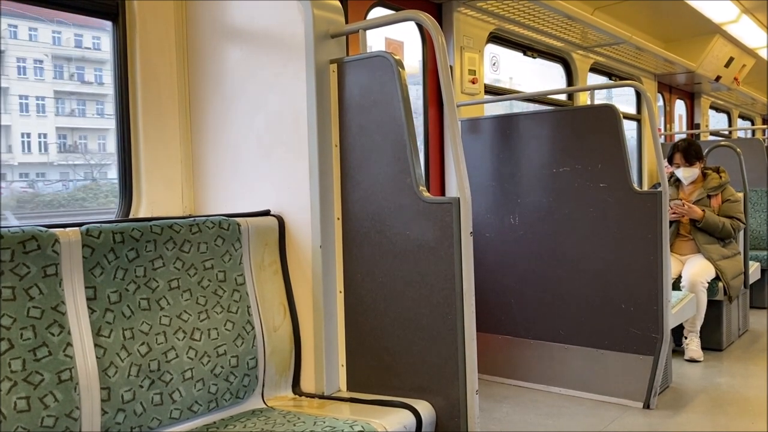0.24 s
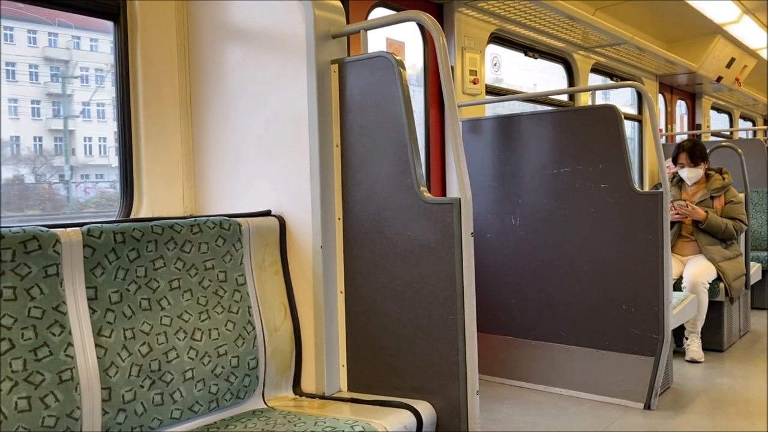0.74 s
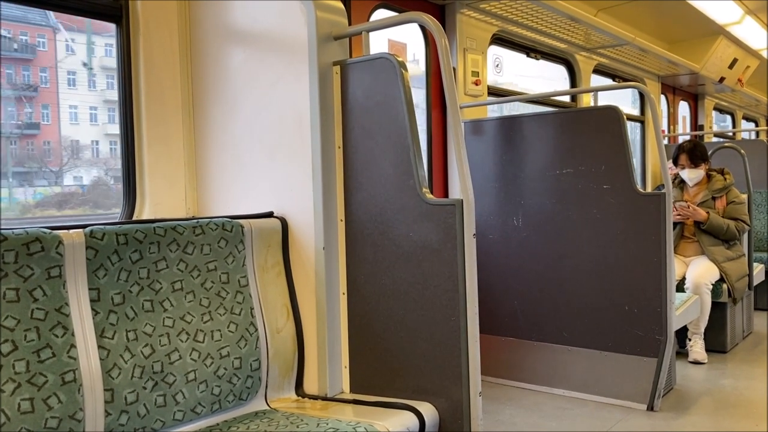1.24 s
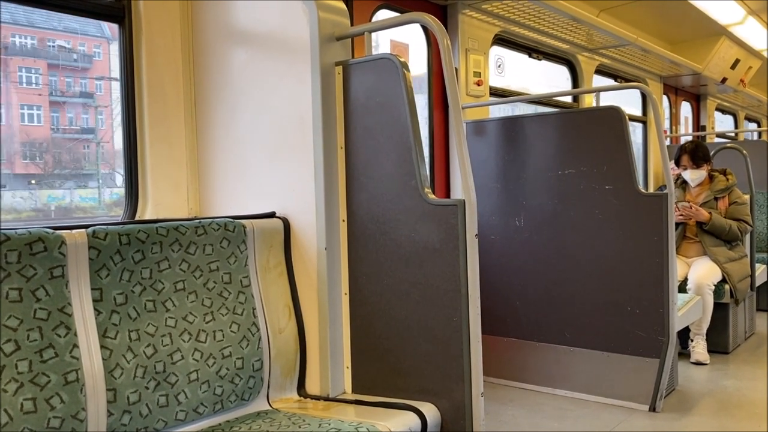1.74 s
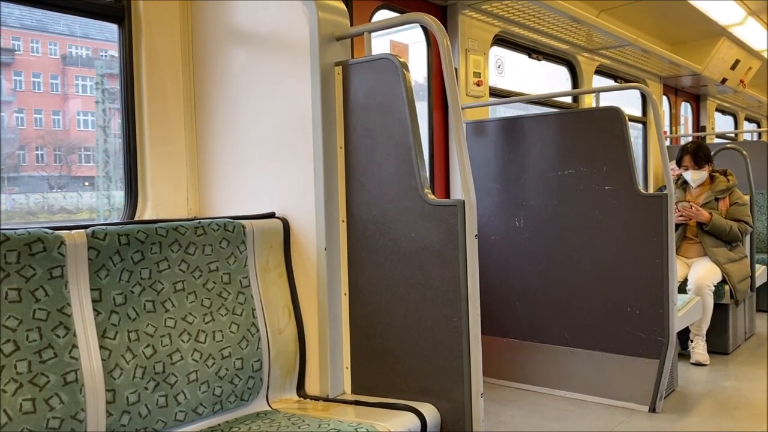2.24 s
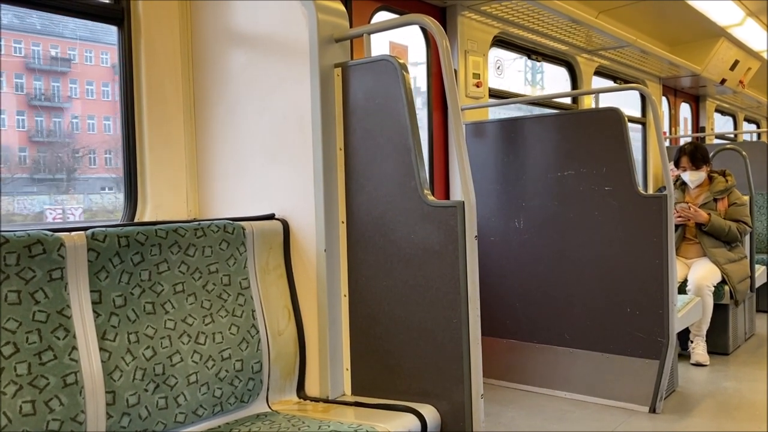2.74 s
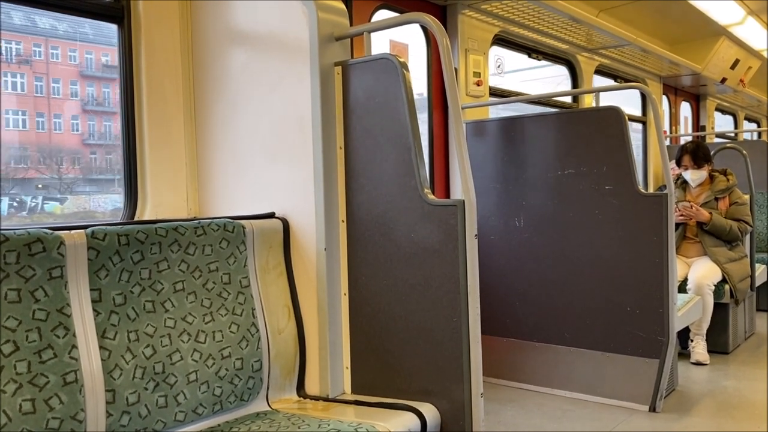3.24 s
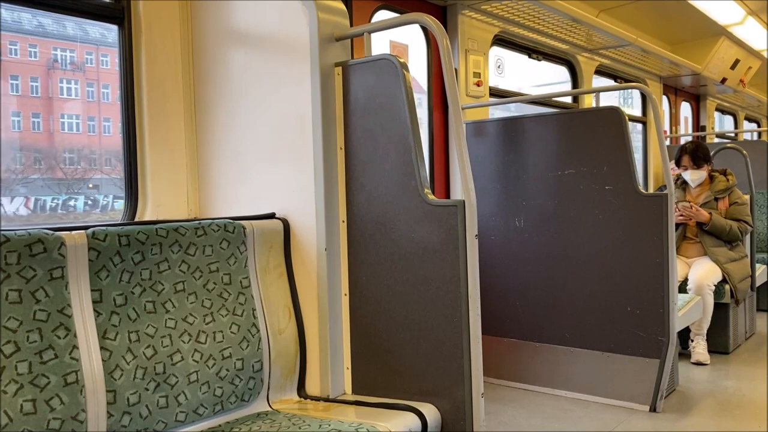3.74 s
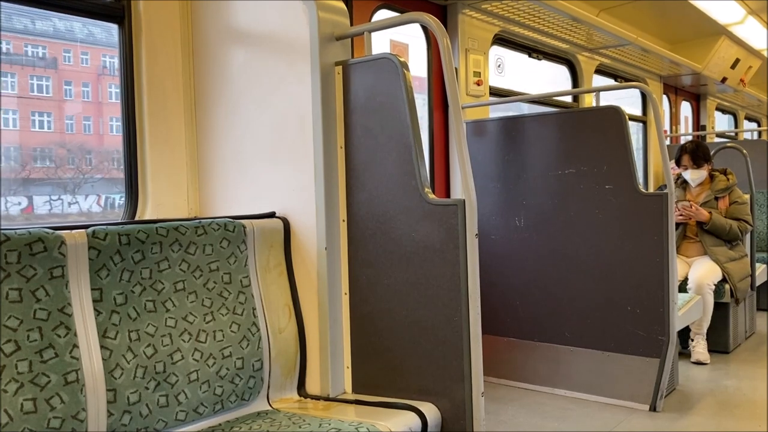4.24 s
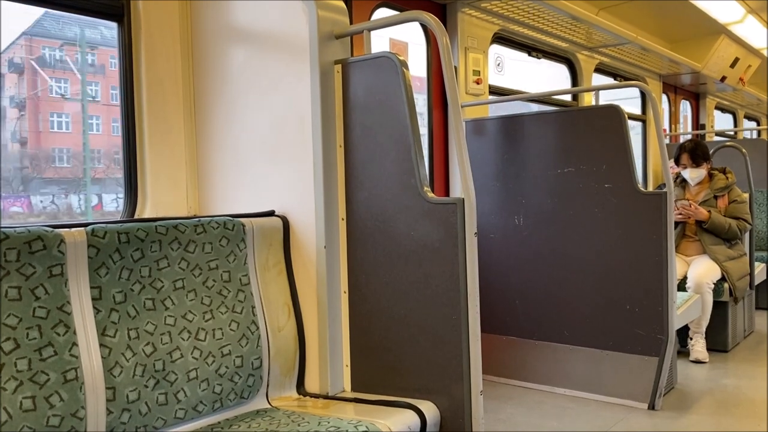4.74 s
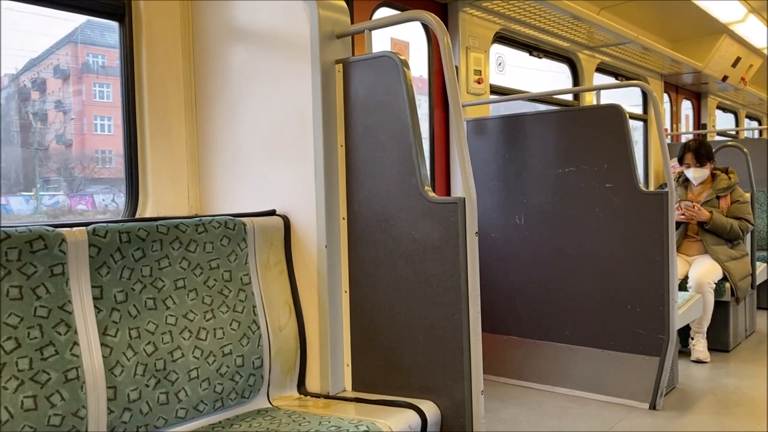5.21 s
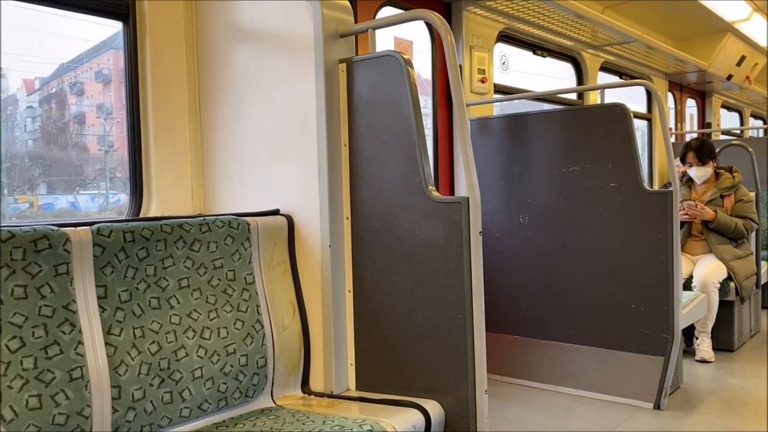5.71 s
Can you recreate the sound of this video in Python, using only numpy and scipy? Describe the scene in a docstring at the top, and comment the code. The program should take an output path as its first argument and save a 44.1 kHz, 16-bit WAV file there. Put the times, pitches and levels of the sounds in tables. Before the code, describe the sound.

A wide stereo pickup within a train carriage: low rumble swelling with track roughness, body drumming and frequent thuds. Early door bangs, chatter and thin panel buzz give way to a smoother stretch. At about four seconds metallic coupling clunks ring, followed by the strongest jolts, sharp steel knocks, grinding and door rattle, with one more door bang late. Quiet ventilation hiss throughout.

```python
"""A deep rumble with frequent jolts fills an electric commuter train at speed, over rolling noise and air hiss.
Under it lie a faint motor hum and a faint narrow high hiss. On two rough stretches the door bangs and rattles;
a panel buzzes on the first, the wheels knock and grind on the second. Coupling clunks and trim ticks come between.
Noise layers are shaped by spectra and follow the track's roughness; blows are decaying noise and ringing modes.
"""
import sys
import numpy as np
from scipy import signal
from scipy.fft import rfft, irfft, next_fast_len
from scipy.io import wavfile
from scipy.ndimage import uniform_filter1d, map_coordinates

SR = 44100
rng = np.random.default_rng(int(sys.argv[2]) if len(sys.argv) > 2 else 0)


def waveform_to_disk(signal):
    """Save audio, clipped to [-1, 1], as 16-bit WAV at the path in sys.argv[1]."""
    frames = np.transpose(np.atleast_2d(signal))
    scaled = np.clip(frames, -1, 1) * 32767
    samples = np.round(scaled).astype(np.int16)
    wavfile.write(sys.argv[1], SR, samples)


N = 263277

# track under the car, rough, smooth, then rougher: (time [s], long waves in the rail [dB], short ripples [dB])
TRACK = [(0, -2.5, 0.5), (.2, -5, -2), (.35, -1, 1.5), (.86, -3.5, 0), (1.02, 1.5, 3.5), (1.16, -4, -0.5),
         (1.32, 1.5, 7.5), (1.58, 0, 2.5), (2.15, 1, -3), (2.3, -6.5, -2.5), (3.3, -8, -6.5),
         (3.82, -6.5, -4.5), (3.95, -2, -2.5), (4.68, -1.5, 0), (4.82, 3, 8.5), (5.4, 0.5, 3.5),
         (5.5, -1.5, -0.5), (5.97, 1, 2.5)]
# motor speed, rising until 1.5 s, then slowly falling: (time [s], relative speed [ratio])
SPEED = [(0, 0.96), (1.5, 1.04), (2.7, 1), (3.6, .978), (5.97, 0.93)]
# car resonances: (centre [Hz], width [Hz], lift [dB])
CAR_MODES = [(110.8, 8.4, 6.5), (298, 14, 8), (346.4, 38, 7.5), (447, 6.4, 10)]


def amp(db):
    """Decibels to gain."""
    return 10 ** (np.asarray(db) / 20)


def along(points, hz):
    """(Hz, value) points read on a log axis."""
    f, v = np.transpose(points)
    return np.interp(np.log(hz + 1), np.log(f + 1), v)


def curves(rows):
    """One value per sample for each column after the time."""
    time_s, *columns = np.transpose(rows)
    return [np.interp(np.arange(N) / SR, time_s, column) for column in columns]


def wobble(knots_per_s):
    """A smooth curve through random knots."""
    knots = rng.standard_normal(int(N * knots_per_s / SR) + 4)
    return map_coordinates(knots, [np.arange(N) * knots_per_s / SR])


def filtered(x, response):
    """Multiply the spectrum of x by a response of frequency."""
    m = next_fast_len(N + SR // 2)
    return irfft(rfft(x, m) * response(np.fft.rfftfreq(m, 1 / SR)), m)[..., :N]


def heard(pair, spectrum, modes=(), wide_db=0, lean_db=0, tilt_db=0):
    """Colour two unrelated signals and spread them: bass near mono, treble all around; mid at rms 1."""
    # stereo width: (frequency [Hz], side minus mid before wide_db [dB])
    side_curve = [(60, -25.5), (110, -9.5), (200, -10.5), (380, -4.5), (700, 1), (1290, 2.5), (2380, -2),
                  (4400, -4), (8120, 1), (15000, 2)]
    # stereo balance: (frequency [Hz], left minus right before lean_db [dB])
    lean_curve = [(60, -2), (110, -0.5), (200, 1.5), (380, 0.5), (700, -0.5), (1290, -2.5), (2380, 1),
                  (4400, 2.5), (8120, -1.5), (15000, -0.5)]

    def colour_db(hz):
        lifts = sum(db / (1 + (2 * (hz - centre) / width) ** 2) for centre, width, db in modes)
        return along(spectrum, hz) + lifts + tilt_db * np.log2(hz + 1)

    def mid_side_gain(hz):
        return amp(colour_db(hz) + np.outer([0, 1], along(side_curve, hz) + wide_db))

    mid, side = filtered(pair, mid_side_gain)
    ears = np.array([mid + side, mid - side]) / np.std(mid)
    return filtered(ears, lambda hz: amp(np.outer([.5, -.5], along(lean_curve, hz) + lean_db)))


def noise():
    """Two unrelated white noises."""
    return rng.standard_normal((2, N))


def steadied(x, seconds):
    """Even out swells slower than the given time."""
    power = uniform_filter1d(x.mean(0) ** 2, max(int(seconds * SR), 8))
    return x / np.sqrt(np.abs(power) + 1e-9)


def blow(start_s, t60_s, attack_s):
    """Envelope of a blow: exponential attack and decay."""
    t = np.arange(SR) / SR
    shape = (1 - np.exp(-t / attack_s)) * amp(-60 * t / t60_s)
    return np.pad(shape, (max(round(start_s * SR), 0), N))[:N]


def spells(table, rise_s, t60_s):
    """Envelope of (start, length, dB) rows: each swells, holds and dies away."""
    t = np.arange(N) / SR
    out = np.zeros(N)
    for start_s, length_s, db in table:
        swell = 1 - np.exp(-np.maximum(t - start_s, 0) / rise_s)
        out += swell * amp(db - 60 * np.maximum(t - start_s - length_s, 0) / t60_s)
    return out


def cabin(x, t60_s):
    """Dense reflections between walls and seats, a different set for each of two paths."""
    t = np.arange(SR // 2) / SR
    tail = rng.standard_normal((2, len(t))) * amp(-60 * t / t60_s)
    return signal.fftconvolve(x[None], tail / np.linalg.norm(tail[0]), axes=1)[:, :N]


def clatter(rough_db):
    """Fast uneven level of parts that bounce against each other, at rms 1."""
    gain = amp(rough_db * wobble(knots_per_s=160))
    return gain / np.sqrt(np.mean(gain ** 2))


def strikes(table, spectrum, modes, attack_s, rough_db, wide_db, lean_db):
    """Blows on one object: a quick contact crack, and a slower body that clatters as it dies."""
    # first contact of hard parts: (frequency [Hz], level [dB])
    crack_spectrum = [(200, -29.5), (800, -3), (1500, 0), (2150, 3.5), (2900, -7), (4500, -17.5),
                      (8000, -27.5), (15000, -45.5)]
    contact = steadied(heard(noise(), crack_spectrum, wide_db=-2.0, lean_db=1.5), seconds=0.0051)
    out = np.zeros((2, N))
    for start_s, db, bright_db, t60_s, crack_db in table:
        body = heard(noise(), spectrum, modes, wide_db, lean_db, tilt_db=bright_db)
        body = blow(start_s, t60_s, attack_s) * clatter(rough_db) * body
        crack = amp(crack_db) * blow(start_s, t60_s=0.028, attack_s=0.00039) * contact
        out += amp(db) * (body + crack)
    return out


def clang(table, modes, ring_db):
    """Each blow leaves a few of the struck part's modes ringing, at a new phase for each ear."""
    t = np.arange(SR // 2) / SR
    out = np.zeros((2, N + SR))
    for start_s, db, *_ in table:
        first = round(start_s * SR)
        for hz, mode_db, t60_s in modes:
            envelope = amp(db + mode_db + ring_db - 60 * t / t60_s) * (1 - np.exp(-t / 0.0011))
            tone = np.sin(2 * np.pi * (hz * t + rng.random((2, 1))))
            out[:, first:first + len(t)] += envelope * tone
    return out[:, :N]


def drumming():
    """A low and a high body band trade places as the rail's ripples get longer or shorter."""
    # drumming bands of the car body: (frequency [Hz], level [dB])
    low_spectrum = [(40, -86), (100, -44.5), (135, -8), (158, 0.5), (182, 2.5), (205, -17), (300, -45),
                    (2000, -140)]
    high_spectrum = [(60, -89.5), (165, -23), (200, 1), (218, -1.5), (232, -5), (263, -4), (286, -21),
                     (350, -19), (600, -54), (2000, -130)]
    # shorter ripples drum higher: (time [s], high band minus low band [dB])
    ripple_pitch = [(0, -2.5), (.8, -1), (1.4, -6), (1.8, 0), (2.2, -0.5), (3.3, 3), (3.6, -2.5),
                    (4.25, -6.5), (4.5, -1), (5, 1.5), (5.4, 2), (5.7, 5), (5.97, -5.5)]
    shift_db, = curves(ripple_pitch)
    high_gain = amp(shift_db + 1.6 * wobble(8.7))
    low = steadied(heard(noise(), low_spectrum, wide_db=-0.5), seconds=0.076)
    high = steadied(heard(noise(), high_spectrum, wide_db=-1.0), seconds=.09)
    return (low + high_gain * high) / np.hypot(1, high_gain)


def rumble():
    """Long waves in the rail shake the floor and boom the cabin air; short ripples drum on the car body."""
    # shaking floor: (frequency [Hz], level [dB])
    floor_spectrum = [(10, -22.5), (22, -15), (33, -22.5), (48, -7), (62, 1), (75, -7.5), (88, 0.5),
                      (98, -12), (125, -18), (220, -41), (800, -140)]
    # booming cabin air: (frequency [Hz], level [dB])
    boom_spectrum = [(30, -69.5), (70, -25), (92, -5), (102, -4.5), (111, 3), (122, -5), (138, 2.5),
                     (150, -6), (175, -34), (300, -60.5), (800, -140)]
    waves_db, ripples_db = curves(TRACK)
    # each level: dB at 0 dB roughness, dB gained per dB of roughness, random drift
    floor_db = -22 + .9 * waves_db + 0.45 * wobble(7.9)
    boom_db = -19 + 0.88 * waves_db + 1.7 * wobble(10)
    body_db = -24.5 + 0.96 * ripples_db + 1.4 * wobble(10)
    floor = steadied(heard(noise(), floor_spectrum, wide_db=-1.5), seconds=0.097)
    boom = steadied(heard(noise(), boom_spectrum, CAR_MODES, wide_db=-2.5), seconds=0.089)
    return amp(floor_db) * floor + amp(boom_db) * boom + amp(body_db) * drumming()


def rolling():
    """Even roar of steel on steel, a little louder on rough track, and the whining hiss of ventilation."""
    # steel on steel: (frequency [Hz], level [dB])
    rail_spectrum = [(60, -63), (200, -23), (330, -0.5), (480, 3.5), (610, -2), (760, -1.5), (950, -6),
                     (1200, -10), (1500, -14.5), (2100, -19.5), (3000, -32.5), (5000, -63), (10000, -91.5)]
    # rail resonances: (centre [Hz], width [Hz], lift [dB])
    rail_modes = [(424, 5.8, 1.3), (679, 26, 4.5), (771.4, 22, 7), (837, 9.4, 3.9), (920, 15, 3.2),
                  (1188, 17, 5.5)]
    # ventilation: (frequency [Hz], level [dB])
    air_spectrum = [(200, -57.5), (900, -22.5), (2000, 2.5), (3100, 2), (3650, 0), (4400, 1), (4950, -4),
                    (5800, -6), (7800, -12.5), (11500, -18.5), (16000, -32.5)]
    # fan resonances: (centre [Hz], width [Hz], lift [dB])
    fan_modes = [(2080, 60, 6.5), (2470, 76, 7.5), (2730, 80, 5), (3180, 110, 4.5), (4250, 400, 1.3),
                 (4600, 130, 2.5)]
    # air hiss: (time [s], level [dB])
    hiss_levels = [(0, -56), (.6, -57.5), (1.4, -57), (1.8, -58), (2.3, -59), (3.5, -60), (4.3, -56.5),
                   (5.3, -57), (5.9, -57.5)]
    _, ripples_db = curves(TRACK)
    hiss_db, = curves(hiss_levels)
    rail_db = -41 + 0.22 * ripples_db + 0.72 * wobble(13)
    rail = amp(rail_db) * heard(noise(), rail_spectrum, rail_modes, wide_db=-0.5, lean_db=1.5)
    air = amp(hiss_db + .3 * wobble(6.7)) * heard(noise(), air_spectrum, fan_modes, lean_db=1.5)
    return rail + air


def hum():
    """Motor tones follow the motor speed, each wavering a little in pitch and strength."""
    # motor tones: (frequency at speed 1 [Hz], relative level [dB])
    motor_tones = [(126, -32.5), (333.8, -46.5)]
    speed, = curves(SPEED)
    out = np.zeros(N)
    for hz, db in motor_tones:
        phase = 2 * np.pi * np.cumsum(hz * speed * (1 + 0.004 * wobble(12))) / SR
        out += amp(db + 4.5 + 1.8 * wobble(4.1)) * np.sin(phase)
    return out


def narrow_hiss():
    """Faint narrow band of hiss near 5.4 kHz that slides with the speed curve: a randomly modulated carrier."""
    centre_hz, speed_power, fuzz_knots_per_s, level_db = 5380, .6, 150, -74.5  # centre at speed 1
    speed, = curves(SPEED)
    phase = 2 * np.pi * np.cumsum(centre_hz * speed ** speed_power) / SR
    ears = []
    for _ in range(2):
        in_phase = wobble(fuzz_knots_per_s) * np.cos(phase)
        quadrature = wobble(fuzz_knots_per_s) * np.sin(phase)
        ears.append(in_phase + quadrature)
    return amp(level_db) * np.array(ears)


def wheels():
    """The wheels drone on the rail's ripples, knock at a rail joint and grind over rough rail."""
    # drone on rail ripples: (frequency [Hz], level [dB])
    drone_spectrum = [(100, -83.5), (240, -11.5), (290, 1), (350, -4), (410, 0.5), (480, -3.5), (550, -8),
                      (630, -17.5), (900, -23.5), (1600, -50.5), (4000, -120)]
    # wheel knocks: (time [s], level [dB], brightness [dB per octave], t60 [s], crack over body [dB])
    knock_rows = [(4.721, -34, 2, 0.35, -14), (4.936, -26, 0, 0.2, -3.5), (4.946, -22, -4, .13, -13.5),
                  (4.961, -26, 1.65, 0.44, -4)]
    # body of a knock: (frequency [Hz], level [dB])
    knock_spectrum = [(60, -48.5), (200, -12.5), (450, 5.5), (620, -5), (800, 4.5), (1150, -6.5),
                      (1450, -18.5), (1750, -19), (2400, -25.5), (3200, -26.5), (3700, -38.5), (4500, -31),
                      (8000, -40), (15000, -58)]
    # wheel resonances: (centre [Hz], width [Hz], lift [dB])
    wheel_modes = [(800, 92, 3.2), (955, 77, 4), (1200, 64, 3.4), (1450, 50, 3.1), (1860, 180, 3.5),
                   (2080, 160, 10), (2300, 140, 7)]
    # steel ringing after a knock: (frequency [Hz], relative level [dB], t60 [s])
    steel_ring = [(698, -4.5, .25), (832, 0, 0.15), (935, -4.5, 0.16), (1184, -11, 0.26),
                  (2026, -8.5, 0.13), (2100, -11, 0.19), (2320, -18.5, .08)]
    # grinding spells: (start [s], length [s], level [dB])
    grind_rows = [(4.745, 0.12, -28), (4.98, .05, -29), (5.16, 0.25, -38.5)]
    # grinding: (frequency [Hz], level [dB])
    grind_spectrum = [(80, -39.5), (300, -3), (500, 9.5), (650, 1.5), (850, -1.5), (1300, -15),
                      (2200, -18.5), (3700, -23.5), (5200, -24.5), (8000, -36.5), (12000, -37),
                      (15500, -52.5)]
    # grinding resonances: (centre [Hz], width [Hz], lift [dB])
    grind_modes = [(448, 23, 13.5), (482, 26, 6), (769, 20, -4), (810, 16, 3.5), (1230, 22, 13.5)]
    _, ripples_db = curves(TRACK)
    surge_db = 2.5 * wobble(14)
    drone = steadied(heard(noise(), drone_spectrum, CAR_MODES, wide_db=-1.5), seconds=0.11)
    drone = amp(-37 + 0.87 * ripples_db + surge_db) * drone
    knocks = strikes(knock_rows, knock_spectrum, wheel_modes,
                     attack_s=0.0022, rough_db=0.2, wide_db=-1.5, lean_db=3.0)
    grind = heard(noise(), grind_spectrum, grind_modes, wide_db=-1)
    grind = spells(grind_rows, rise_s=0.013, t60_s=0.18) * grind
    return drone + knocks + clang(knock_rows, steel_ring, ring_db=-6.5) + grind


def door():
    """The sliding door bangs in its frame and chatters in many small impacts that the cabin blurs."""
    # door: (frequency [Hz], level [dB])
    door_spectrum = [(80, -51), (300, -15), (550, 8.5), (850, 9), (1200, 1.5), (1900, -8), (3200, -14),
                     (3700, -11), (4400, -14), (5200, -18.5), (8000, -28.5), (12000, -38.5), (16000, -54.5)]
    # door resonances: (centre [Hz], width [Hz], lift [dB])
    door_modes = [(755, 27, 2.5), (1330, 57, 1.9), (1580, 100, 6.1), (2500, 570, 3.3), (2920, 300, 4.7)]
    # bangs: (time [s], level [dB], brightness [dB per octave], t60 [s], crack over body [dB])
    bang_rows = [(.282, -41, -7.5, 0.2, -14), (.913, -41, 0.8, 0.4, -5), (.923, -39.5, -0.5, 0.36, -0.5),
                 (1.03, -40, -5, 0.44, -11.5), (1.24, -45, 3, 0.47, -4), (1.295, -44.5, -2, 0.19, -4.5),
                 (1.316, -37, -1, .22, -5), (1.356, -41.5, 1.5, .15, -1), (1.422, -43, 2.5, .2, -3),
                 (5.519, -35.5, 1, 0.26, 2)]
    # door leaf ringing after a bang: (frequency [Hz], relative level [dB], t60 [s])
    leaf_ring = [(1344, -4, 0.36), (1510, -0.5, .3), (2215, -6.5, .25), (2460, -8, .3), (2570, -7, .32),
                 (2730, -8, .25), (4230, -14.5, 0.29)]
    # fits of loud chatter: (start [s], length [s], level [dB])
    rattle_rows = [(.93, .1, -51.5), (1.235, 0.22, -41), (4.28, 0.1, -49), (4.74, 0.31, -44),
                   (5.9, .1, -37.5)]
    _, ripples_db = curves(TRACK)
    faint = amp(-68 + 0.89 * ripples_db)
    fits = spells(rattle_rows, rise_s=0.064, t60_s=0.2)
    impacts = (rng.random(N) < 400 / SR) * rng.standard_normal(N)  # about 400 a second
    blurred = cabin(impacts, t60_s=0.47)
    chatter = (faint + fits) * heard(blurred, door_spectrum, door_modes, wide_db=0.5, lean_db=1.0)
    bangs = strikes(bang_rows, door_spectrum, door_modes,
                    attack_s=0.00065, rough_db=1.5, wide_db=1.5, lean_db=1.5)
    return chatter + bangs + clang(bang_rows, leaf_ring, ring_db=-10.0)


def jolts():
    """Each dent in the rail gives a dull thud and sets the car ringing briefly at its pitch."""
    # jolts, higher for shorter dents: (time [s], level [dB], pitch [Hz], t60 [s])
    jolt_rows = [(0.02, -16, 146.4, 0.19), (0.272, -9.5, 270, 0.18), (0.306, -6, 146, 0.31),
                 (0.358, -14, 110.8, 0.18), (0.52, -7.5, 125, 0.18), (.636, -11.5, 221.7, 0.13),
                 (0.756, -18.5, 124.7, 0.28), (1.017, -9.5, 160, 0.3), (1.05, -16, 250, 0.14),
                 (1.09, -11, 150, .15), (1.17, -3.5, 123.9, 0.22), (1.251, -11, 160.9, 0.49),
                 (1.25, -11, 284, 0.15), (1.31, -28, 351.4, 0.64), (1.375, -8.5, 108.2, 0.19),
                 (1.42, -23, 355, 0.22), (1.488, -11, 168.5, 0.34), (1.719, -8, 115.3, 0.16),
                 (1.735, -19, 255.4, .4), (1.884, -10.5, 63.8, 0.27), (2.05, -11.5, 133, 0.46),
                 (2.11, -15, 60.6, .28), (3.46, -15.5, 118, 0.76), (3.921, -10, 112, 0.64),
                 (4.119, -13, 138.8, 0.57), (4.305, -11, 147, 0.22), (4.43, -5, 112.5, 0.15),
                 (4.556, -2, 89.8, 0.18), (4.755, 0, 174.9, 0.2), (4.751, -16.5, 298.7, 0.33),
                 (4.826, -8.5, 72.3, 0.22), (4.865, -13.5, 245, 0.29), (4.914, -4.5, 112, 0.3),
                 (4.936, -6, 212, 0.26), (4.945, -7, 165, .35), (5.08, -5.5, 106, 0.12),
                 (5.17, -9.5, 208.5, .3), (5.251, -9.5, 105, 0.22), (5.345, -13, 195, 0.55),
                 (5.55, -9.5, 68.1, 0.27), (5.55, -8, 210, 0.37), (5.571, -11.5, 109.6, 0.61),
                 (5.865, -11.5, 126.9, 0.25)]
    skirt_db_per_octave, thud_db, ring_db = 38, -4, 0
    skirt_db = -3 * skirt_db_per_octave  # three octaves away from the pitch
    out = np.zeros((2, N))
    for start_s, db, hz, t60_s in jolt_rows:
        spectrum = [(hz / 8, skirt_db), (hz, 0), (hz * 8, skirt_db)]
        thud = steadied(heard(noise(), spectrum), seconds=.06)
        cycles = np.cumsum(hz * (1 + 0.0203 * wobble(20))) / SR
        ring = np.sin(2 * np.pi * (cycles + rng.random()))
        out += amp(db) * blow(start_s, t60_s, attack_s=0.012) * (amp(thud_db) * thud + amp(ring_db) * ring)
    return out


def panel():
    """A thin door panel buzzes in short spells: noise with a fast uneven level."""
    # buzzing spells: (start [s], length [s], level [dB])
    buzz_rows = [(.916, 0.025, -50.5), (.99, .06, -58.5), (1.29, 0.12, -49)]
    # thin panel: (frequency [Hz], level [dB])
    panel_spectrum = [(1000, -26), (2000, -7.5), (2330, -6.5), (2500, 1), (2800, -0.5), (3100, -2),
                      (3450, -6), (3750, -12), (4200, -9), (4700, -13.5), (5200, -18.5), (12000, -44.5)]
    buzz = clatter(rough_db=2.5) * heard(noise(), panel_spectrum, wide_db=-1.0, lean_db=0.5)
    return spells(buzz_rows, rise_s=.006, t60_s=0.55) * buzz


def coupling():
    """The coupling takes up slack in clunks with a soft attack, and rings on."""
    # clunks: (time [s], level [dB], brightness [dB per octave], t60 [s], crack over body [dB])
    clunk_rows = [(3.585, -41.5, -0.5, 0.33, -11.5), (4.087, -33, 1.5, .28, -3.5),
                  (4.104, -32.5, 0, 0.39, -4.5), (4.114, -32.5, -2.5, 0.44, -9),
                  (4.205, -35, -5.5, 0.29, -16), (4.229, -34.5, -2.5, 0.37, -8.5),
                  (4.276, -37.5, -3.5, 0.33, -5)]
    # body of a clunk: (frequency [Hz], level [dB])
    clunk_spectrum = [(80, -81), (350, -4), (560, 8.5), (730, -1), (920, 6), (1150, -6), (1400, -7.5),
                      (2000, -7), (2500, -19), (3200, -13), (3700, -19), (5000, -23.5), (8000, -35),
                      (15000, -55)]
    # coupling resonances: (centre [Hz], width [Hz], lift [dB])
    clunk_modes = [(860, 120, 2), (1360, 70, 5.4), (1560, 80, 6.5), (1760, 53, 2.7), (2294, 87, 8.7),
                   (2800, 130, 7.7)]
    # ringing after a clunk: (frequency [Hz], relative level [dB], t60 [s])
    clunk_ring = [(504, 0.5, .36), (608, 0.5, .25), (853, 1, .22), (1296, -2.5, .3), (1444, -3, 0.28),
                  (1720, -6.5, .25), (2230, -10, .25), (3060, -17, .2), (3210, -16, .18)]
    clunks = strikes(clunk_rows, clunk_spectrum, clunk_modes,
                     attack_s=0.0035, rough_db=0.0, wide_db=1.0, lean_db=0.5)
    return clunks + clang(clunk_rows, clunk_ring, ring_db=-9.5)


def ticks():
    """Loose trim ticks: bright noise under short decaying envelopes."""
    # ticks: (time [s], level [dB], t60 [s])
    tick_rows = [(3.904, -54.5, 0.43), (4.02, -62, 0.36), (4.29, -59, 0.47), (4.41, -60, .45),
                 (4.526, -61.5, 0.037), (5.48, -57, 0.45)]
    # loose trim: (frequency [Hz], level [dB])
    trim_spectrum = [(400, -62.5), (1500, -21), (4000, 8.5), (7000, -1.5), (11000, -6), (15500, -14.5)]
    envelope = sum(amp(db) * blow(start_s, t60_s, attack_s=.002) for start_s, db, t60_s in tick_rows)
    return envelope * heard(noise(), trim_spectrum, wide_db=0.5, lean_db=1.5)


def scene():
    """Sum of all sources in the cabin."""
    steady = rumble() + rolling() + hum() + narrow_hiss()
    return steady + wheels() + door() + jolts() + panel() + coupling() + ticks()


def record(dry):
    """Round off the highest peaks, then cut everything above the band limit."""
    ceiling, top_hz = .97, 15750
    soft = dry / (1 + np.abs(dry / ceiling) ** 8) ** (1 / 8)
    return filtered(soft, lambda hz: hz < top_hz)


dry = scene()
out = record(dry)
waveform_to_disk(out)
```